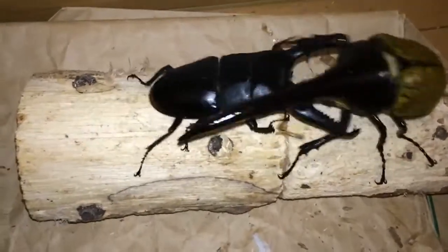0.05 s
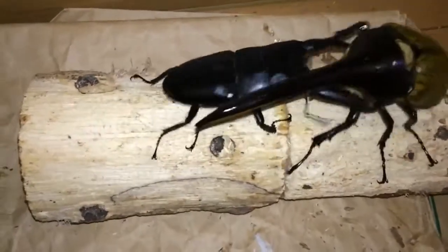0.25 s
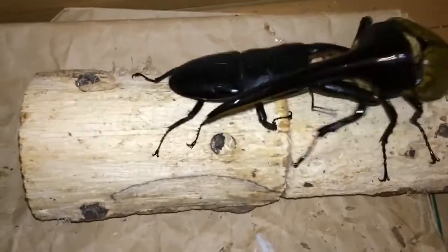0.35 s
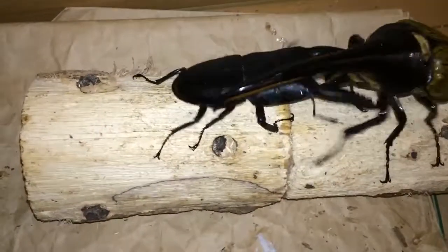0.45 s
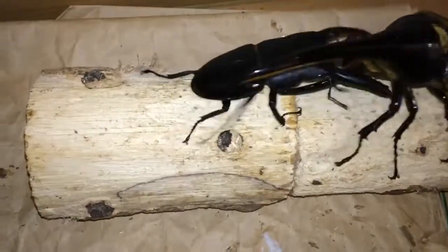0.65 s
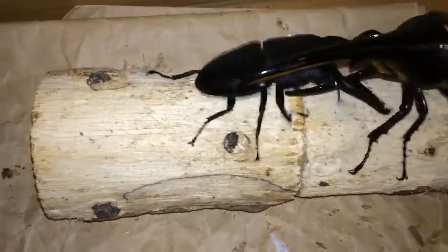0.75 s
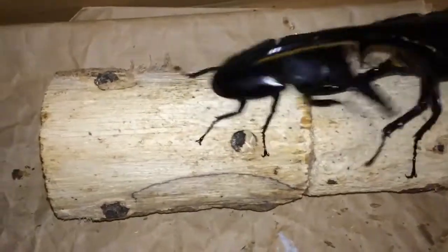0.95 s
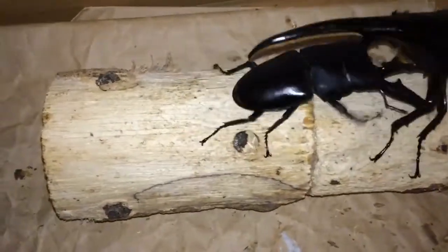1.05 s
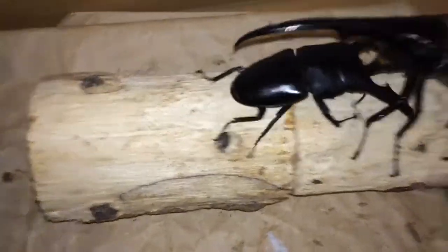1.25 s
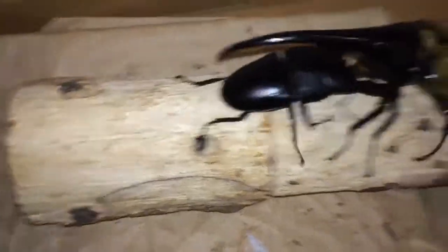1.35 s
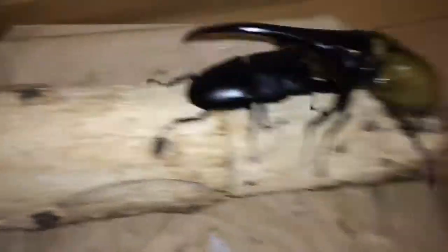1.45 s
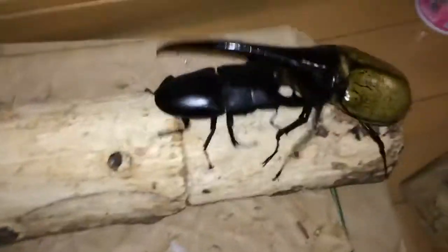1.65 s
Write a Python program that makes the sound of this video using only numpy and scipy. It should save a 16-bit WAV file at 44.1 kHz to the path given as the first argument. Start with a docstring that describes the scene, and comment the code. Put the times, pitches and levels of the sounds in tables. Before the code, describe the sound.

Dry, irregular clicking and scratching comes from two beetles wrestling on a log, heard up close in a quiet room. An early flurry of shell snaps gives way to light claw taps, raspy drags and faint hollow knocks.

```python
"""Beetles grappling on a dry log

Two large beetles, close to a single microphone in a quiet room. Claws and horns snap against
hard shell; feet tap the wood, catch on fibres and drag over the grain in raspy scrapes.
The log bumps dully on its support and hums hollowly under the shoves."""
import sys
import numpy as np
from scipy import signal
from scipy.io import wavfile

SR = 44100
rng = np.random.default_rng(int(sys.argv[2]) if len(sys.argv) > 2 else 0)


def unload_audio(sound):
    """Save the sound as a 16-bit wav file, at the path given as the first command line argument."""
    columns = np.transpose(np.atleast_2d(sound))
    # keep every value between -1 and 1, then stretch to whole-number steps
    steps = np.round(np.clip(columns, -1, 1) * 32767)
    wavfile.write(sys.argv[1], SR, steps.astype(np.int16))


N = 74970
FREQS_HZ = np.fft.rfftfreq(4096, 1 / SR) + 1


def amp(db):
    """Decibels to gain."""
    return 10 ** (np.asarray(db) / 20)


def unit(x):
    """Scales to rms 1."""
    return x / np.sqrt(np.mean(x ** 2) + 1e-20)


def unit_hit(sound):
    """Scales a short sound to the energy of one millisecond at rms 1."""
    return sound / np.sqrt(np.sum(sound ** 2) / (SR * .001))


def add(mix, start_s, sound):
    """Mixes a sound in from start_s."""
    at = round(start_s * SR)
    sound = sound[max(-at, 0):]
    part = mix[max(at, 0):][:len(sound)]
    part += sound[:len(part)]


def colour(points, tilt_db=0):
    """A spectrum in dB, tilted by tilt_db per octave above 2.8 kHz, pivoting at 5 kHz."""
    hz, db = np.transpose(points)
    octaves = np.log2(np.maximum(FREQS_HZ, 2800) / 5000)
    return np.interp(np.log(FREQS_HZ), np.log(hz), db) + tilt_db * octaves


def shaped(x, db):
    """Passes x through a causal filter with this spectrum."""
    log_gain = np.log(amp(np.r_[db, db[-2:0:-1]]))
    impulse = np.fft.ifft(np.exp(np.conj(signal.hilbert(log_gain)))).real
    return signal.fftconvolve(x, impulse[:len(db)])[:len(x)]


def stroke(t, rise_s, fall_s):
    """Pressure swells up to t = 0 and dies away."""
    return np.exp(-(np.minimum(t, 0) / rise_s) ** 2 - np.maximum(t, 0) / fall_s)


# The quiet room behind the log: frequency_hz, gain_db
ROOM_SPECTRUM = [(28, -47), (52, -1), (100, 2), (190, 0.5), (300, -11.5), (600, -15.5), (4000, -22.5),
                 (15000, -23.5)]


def room_tone(level_db):
    """A steady, low hush at the microphone."""
    return amp(level_db) * unit(shaped(rng.standard_normal(N), colour(ROOM_SPECTRUM)))


# Claw on wood grain, heard close: frequency_hz, gain_db
GRAIN_SPECTRUM = [(100, -1.5), (450, -1.5), (750, -10), (1200, -4.5), (2600, -2.5), (3700, -3), (6400, -1),
                  (8300, -4), (14000, -5.5), (15500, -6.5)]
# Feet dragging along the log: peak_s, fall_s, level_db, tilt_db (per octave)
FOOT_SCRAPES = [(.002, 0.018, -52, 1.5), (0.048, 0.0092, -59, -5), (0.086, 0.033, -56, 4),
                (0.191, 0.025, -52, -0.5), (.365, 0.035, -54, -2), (0.401, 0.02, -47, -2),
                (0.471, 0.038, -44.5, 0), (.545, 0.039, -46.5, 1.5), (0.631, 0.016, -53, -5.5),
                (.665, 0.018, -52.5, -0.5), (.764, 0.019, -50, 1), (0.89, 0.01, -43.5, -3),
                (.931, 0.028, -51, -1.5), (1.005, 0.092, -57, 0.5), (1.09, 0.018, -49.5, -2.5),
                (1.135, 0.014, -51, -1.5), (1.175, 0.017, -48.5, -12), (1.243, 0.027, -42, -1),
                (1.365, 0.048, -55.5, -3), (1.411, 0.017, -38.5, -1), (1.485, 0.083, -59, -2.5),
                (1.576, 0.03, -52.5, -2), (1.638, 0.019, -50.5, -3)]


def scrape(peak_s, fall_s, level_db, tilt_db):
    """A claw slips on many fibres over a fine rub: bright scrapes crackle, dull ones rasp."""
    t = np.arange(-.1, .25, 1 / SR)
    slips_per_s = 650 * amp(.35 * (level_db + 50))  # louder scrapes slip more often
    sizes = amp(4.5 * np.minimum(rng.exponential(1, len(t)), 3))
    slips = sizes * (rng.random(len(t)) < slips_per_s / SR)
    slip_power = signal.lfilter([1], [1, -np.exp(-2 / (.001 * SR))], slips ** 2)  # 1 ms decay
    rub = .5 * amp(-3 * tilt_db)
    grain = np.sqrt(slip_power / slip_power.mean() + rub ** 2) * rng.standard_normal(len(t))
    pressure = stroke(t, .61 * fall_s, fall_s)
    sound = shaped(grain * pressure, colour(GRAIN_SPECTRUM, tilt_db))
    return peak_s + t[0], amp(level_db) * unit(sound) * np.sqrt(np.mean(pressure ** 2))


# A hard click, heard close: frequency_hz, gain_db
CLICK_SPECTRUM = [(100, -10), (1100, -38), (1600, -4), (2400, -4), (4300, 0.5), (6400, 2), (8300, 0),
                  (13500, 0.5), (15500, -5)]
# The knock in the wood underneath: frequency_hz, gain_db
KNOCK_SPECTRUM = [(60, -27), (170, -2.5), (420, 8.5), (750, -7), (1200, 3.5), (2000, 6), (5000, -92)]
# Modes of the beetles' shell: pitch_hz, width_hz, gain_db
SHELL_RESONANCES = [(2450, 450, 5), (4580, 380, 2), (6560, 590, 5), (12300, 950, 2.5)]
# Claws and horns on shell, near the microphone: crack_s, level_db, tilt_db (per octave), knock_db
SHELL_SNAPS = [(0.0819, -42.5, 9, -17), (0.1853, -33, -0.5, -19), (0.2066, -24, -0.5, -17),
               (.3180, -38, 3.5, -16), (0.3553, -30.5, -1.5, -8.5), (0.3734, -31, -4.5, -19),
               (0.397, -30.5, 0, -8), (0.4072, -40.5, -4, -8), (0.4216, -23, -1.5, -10.5),
               (0.447, -44, -15, -6), (.4582, -12.5, 4.5, -2), (0.504, -32.5, -4, -9), (0.561, -34, 3, -12),
               (0.626, -40, -1.5, -2), (0.6599, -39.5, -2.5, -8), (.7829, -38.5, -3.5, -10.5),
               (0.8938, -38.5, -4, -7), (0.9105, -21.5, 4.5, -19), (0.9145, -31.5, -3.5, -17),
               (.9586, -38.5, 0, -15), (1.1120, -37, 3.5, -1), (1.2432, -29.5, 2, -11),
               (1.5498, -40, -4, -8), (1.626, -40, -4.5, -8)]


def snap(crack_s, level_db, tilt_db, knock_db):
    """A short creep, a crack and a rattle of the shell, with a knock passed into the wood."""
    t = np.arange(-.004, .03, 1 / SR)
    gap_s = abs(t)
    creep = amp(-8) * np.exp(-gap_s / .0004)
    rattle_s = .0024 * amp(.09 * knock_db)  # harder knocks rattle longer
    envelope = np.where(t < 0, creep, np.exp(-gap_s / rattle_s))
    crack = np.where(gap_s == gap_s.min(), 1, 0)
    burst = unit(envelope * rng.standard_normal(len(t))) + amp(-3) * unit(crack)
    modes_db = sum(db / (1 + ((FREQS_HZ - hz) / width) ** 2) for hz, width, db in SHELL_RESONANCES)
    shell = shaped(unit(burst), colour(CLICK_SPECTRUM, tilt_db) + modes_db)
    push = (t >= 0) * np.exp(-gap_s / .0039) * rng.standard_normal(len(t))
    knock = shaped(unit(push), colour(KNOCK_SPECTRUM) + knock_db - tilt_db)
    return crack_s + t[0], amp(level_db) * unit_hit(shell + knock)


# Legs and horns landing on the log: start_s, level_db, pitch_hz, ring_s, click_db
WOOD_TAPS = [(0.2052, -30, 2880, 0.00094, -13), (.4218, -31, 2380, 0.0011, -9),
             (0.4595, -29.5, 2470, 0.001, -16), (0.6135, -42, 2050, 0.00095, -4.5),
             (.8242, -39, 3500, 0.00059, -0.5), (0.93, -41, 3050, .002, -7),
             (1.0702, -49, 2910, 0.00068, 9), (1.0808, -39.5, 3150, 0.0019, 3),
             (1.1684, -36.5, 3000, .0008, 0), (1.2002, -29.5, 2810, 0.0019, -5.5),
             (1.2364, -37.5, 1745, .001, -1.5), (1.398, -39.5, 3310, 0.00069, 6.5),
             (1.4375, -39.5, 3030, .0012, -4), (1.5747, -45, 1800, .0012, 3.5),
             (1.692, -39, 3100, 0.0011, 2.5)]


def tap(start_s, level_db, pitch_hz, ring_s, click_db):
    """A claw lands with a dull click and rings one spot of the wood."""
    t = np.arange(0, .03, 1 / SR)
    ring = (1 - np.exp(-t * pitch_hz)) * np.exp(-t / ring_s) * np.sin(2 * np.pi * pitch_hz * t)
    contact = np.exp(-t / .0017) * rng.standard_normal(len(t))
    click = shaped(contact, colour(CLICK_SPECTRUM, tilt_db=-3))
    return start_s, amp(level_db) * (unit_hit(ring) + amp(click_db) * unit_hit(click))


# Down where the log rests on its support: start_s, level_db, pitch_hz, decay_s
LOG_BUMPS = [(0.359, -57, 93.4, 0.04), (0.456, -47, 185, 0.0078), (0.877, -54, 139, 0.018),
             (1.354, -50.5, 97.5, 0.022), (1.409, -60.5, 149.7, 0.056)]


def bump(start_s, level_db, pitch_hz, decay_s, rise_s=.0024):
    """The log rocks with a low, quickly damped thud."""
    t = np.arange(0, .25, 1 / SR)
    envelope = 2 * (1 - np.exp(-t / rise_s)) * np.exp(-t / decay_s)
    return start_s, amp(level_db) * envelope * np.sin(2 * np.pi * pitch_hz * t)


# Claw tips catching on the log's surface, faint even this close: start_s, level_db
FIBRE_CATCHES = [(.483, -45), (.4915, -38), (.526, -45), (.547, -37.5), (.718, -52.5), (0.757, -49.5),
                 (1.288, -43)]


def catch(start_s, level_db, decay_s=.001):
    """One fibre lets go with a tiny, dry tick."""
    t = np.arange(0, .03, 1 / SR)
    slip = np.exp(-t / decay_s) * rng.standard_normal(len(t))
    return start_s, amp(level_db) * unit_hit(shaped(slip, colour(GRAIN_SPECTRUM)))


# Hollow modes of the log: pitch_ratio, width_hz, gain_db
LOG_RESONANCES = [(1, 34, -4), (2.32, 130, -6), (3.6, 350, -12.5)]
# Shoves, heard through the body of the log: peak_s, fall_s, level_db, pitch_hz, upper_modes_db
LOG_SHOVES = [(0.504, 0.0068, -59, 513, 18), (0.88, 0.0083, -47.5, 483, -4.5),
              (1.064, 0.026, -48.5, 482, -10.5), (1.214, 0.024, -45.5, 506, -1.5),
              (1.246, 0.026, -49.5, 497, 1), (1.418, 0.025, -53, 476, -1.5)]


def shove(peak_s, fall_s, level_db, pitch_hz, upper_modes_db, bend=.05):
    """Friction drives the hollow modes of the log; the hum bends up as the pressure grows."""
    t = np.arange(-.15, .25, 1 / SR)
    pressure = stroke(t, .74 * fall_s, fall_s)
    cycles = np.cumsum(pitch_hz * (1 + bend * (pressure - 1))) / SR
    hum = np.zeros(len(t))
    for ratio, width_hz, gain_db in LOG_RESONANCES:
        pole = np.exp(-np.pi * width_hz / SR)
        friction = rng.standard_normal(len(t)) + 1j * rng.standard_normal(len(t))
        waver = signal.lfilter([1], np.poly([pole, pole]), friction)
        waver /= np.sqrt(abs(waver))  # steadies the level
        ring = (waver * np.exp(2j * np.pi * ratio * cycles)).real
        hum += amp(gain_db + upper_modes_db * (ratio > 1)) * unit(ring * pressure)
    return peak_s + t[0], amp(level_db) * hum * np.sqrt(np.mean(pressure ** 2))


def reflections(direct, level_db, t60_s):
    """A short, faint tail from nearby surfaces, 3 ms behind the direct sound."""
    t = np.arange(0, .3, 1 / SR)
    tail = rng.standard_normal(len(t)) * (t > .003) * amp(-60 * t / t60_s)
    return amp(level_db) * signal.fftconvolve(direct, tail / np.linalg.norm(tail))[:N]


def scene():
    """Beetles and log up close, the room well behind them, in mono."""
    direct = np.zeros(N)
    for source, table in ((snap, SHELL_SNAPS), (tap, WOOD_TAPS), (catch, FIBRE_CATCHES),
                          (scrape, FOOT_SCRAPES), (shove, LOG_SHOVES), (bump, LOG_BUMPS)):
        for row in table:
            add(direct, *source(*row))
    return (direct + room_tone(level_db=-63) + reflections(direct, level_db=-18.5, t60_s=.1))[None]


def record(dry):
    """The recorder passes nothing much above 15.4 kHz."""
    lowpass = signal.firwin(255, 15400, window=("kaiser", 8), fs=SR)
    return signal.oaconvolve(dry, lowpass[None], "same")


dry = scene()
out = record(dry)
unload_audio(out)
```